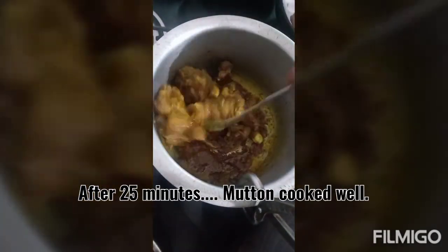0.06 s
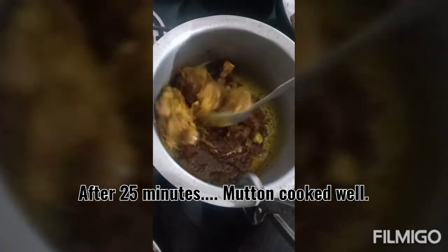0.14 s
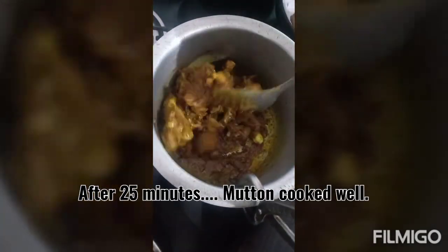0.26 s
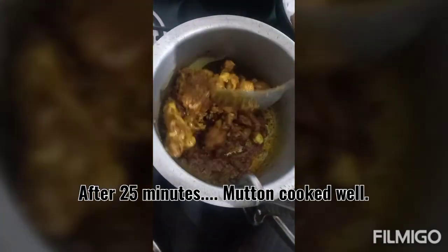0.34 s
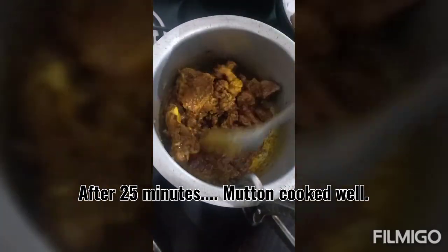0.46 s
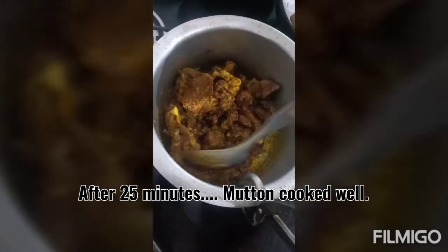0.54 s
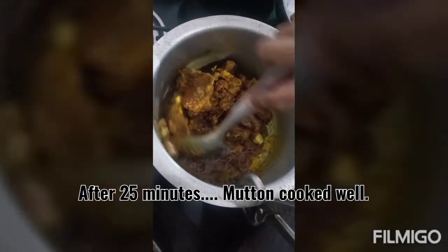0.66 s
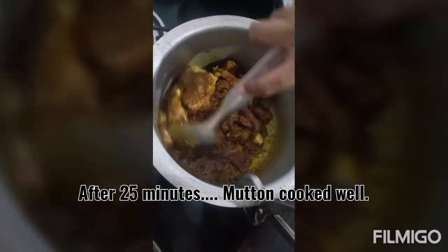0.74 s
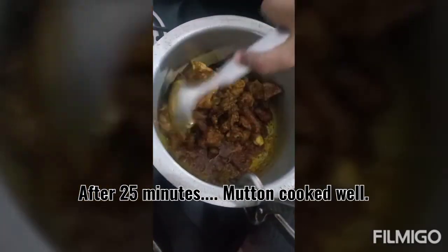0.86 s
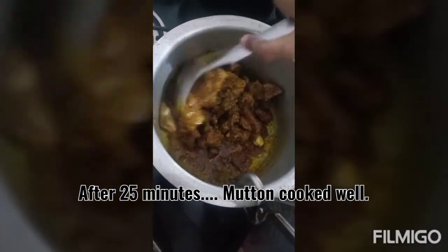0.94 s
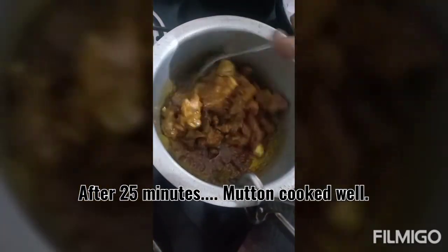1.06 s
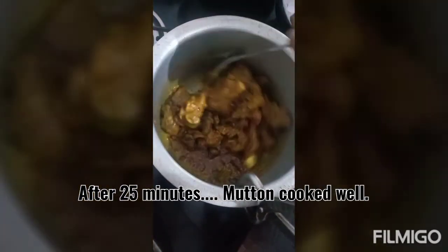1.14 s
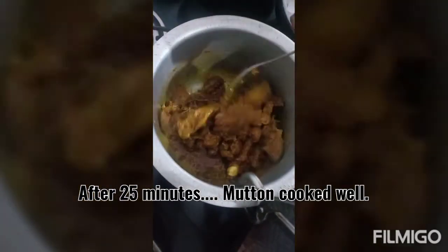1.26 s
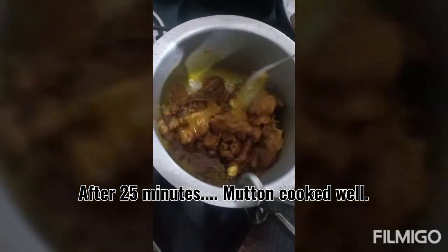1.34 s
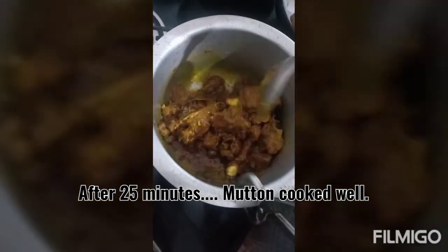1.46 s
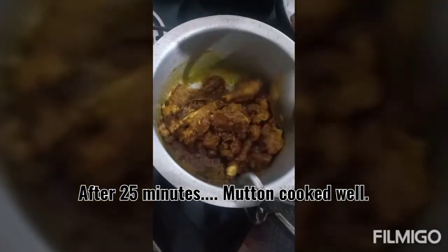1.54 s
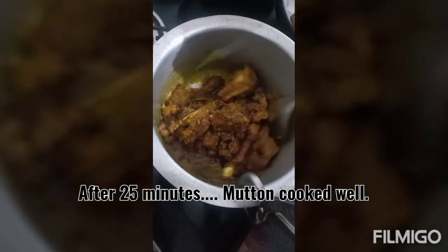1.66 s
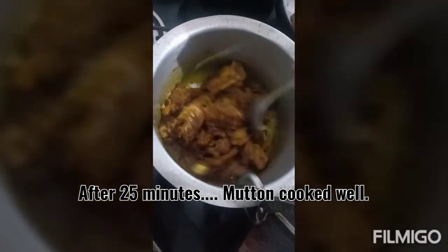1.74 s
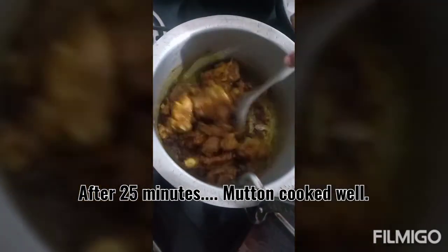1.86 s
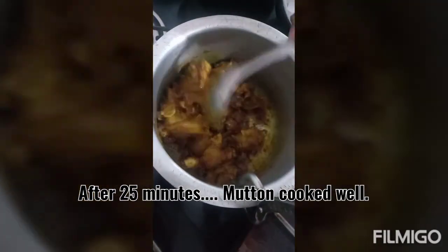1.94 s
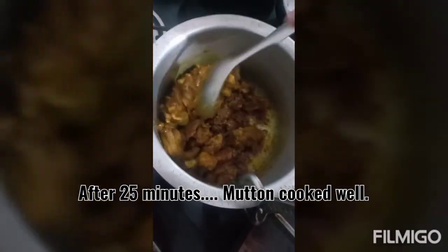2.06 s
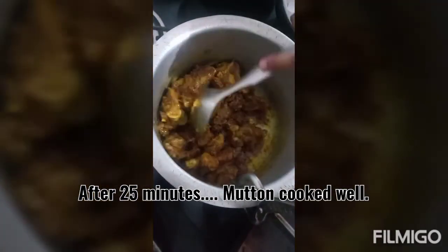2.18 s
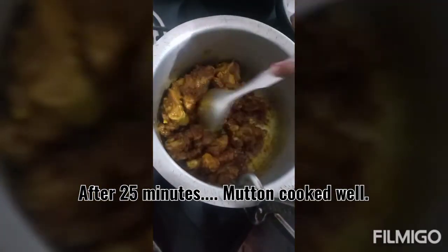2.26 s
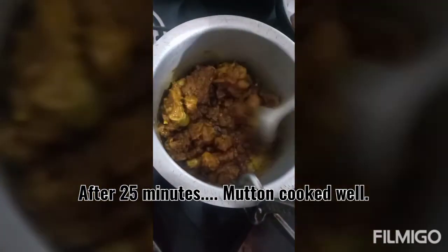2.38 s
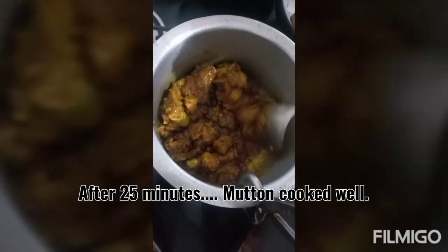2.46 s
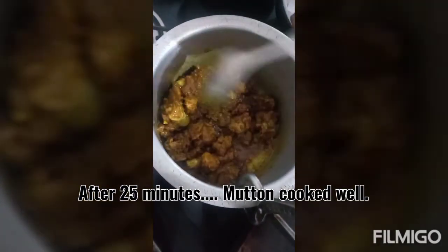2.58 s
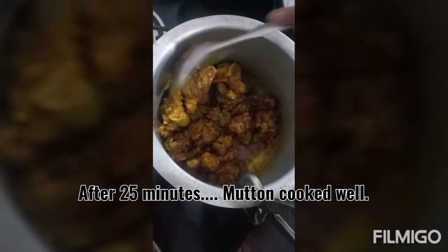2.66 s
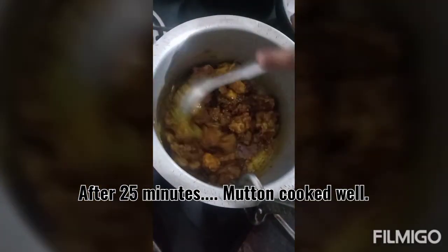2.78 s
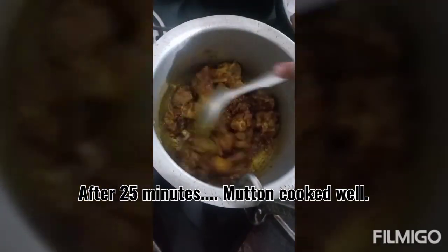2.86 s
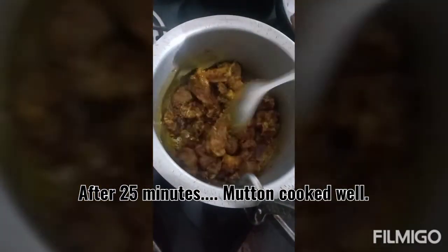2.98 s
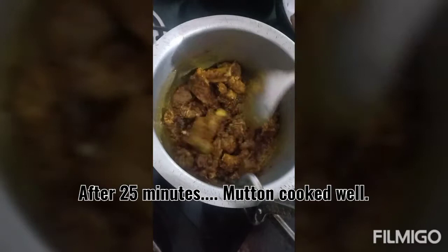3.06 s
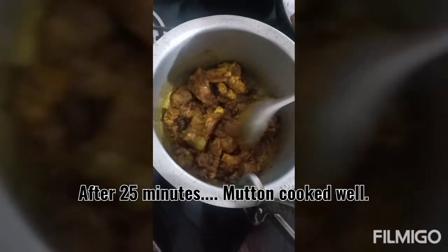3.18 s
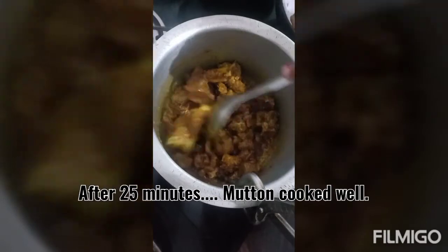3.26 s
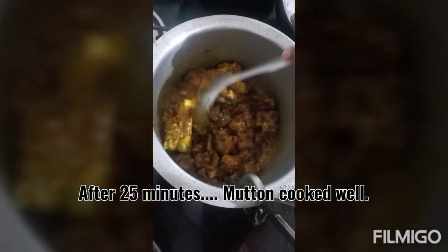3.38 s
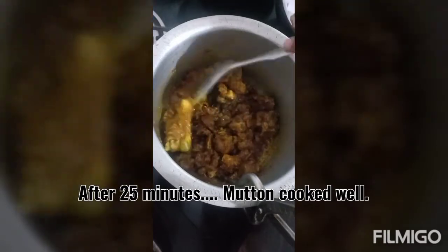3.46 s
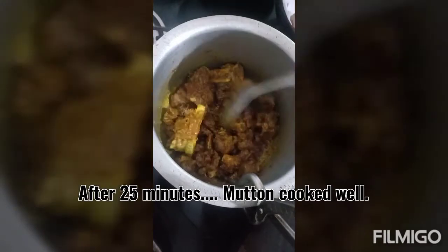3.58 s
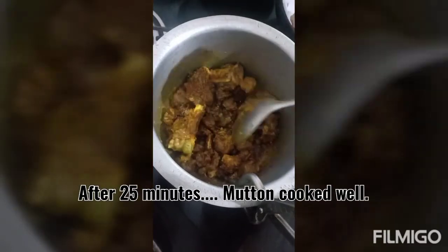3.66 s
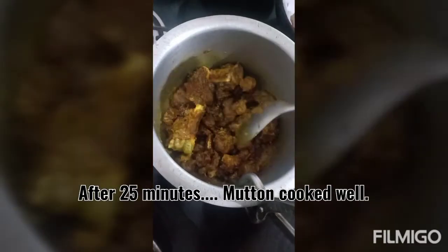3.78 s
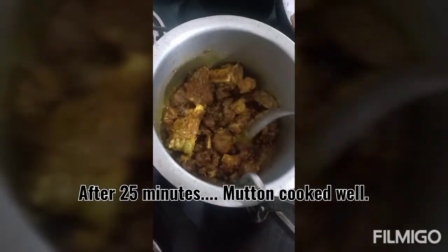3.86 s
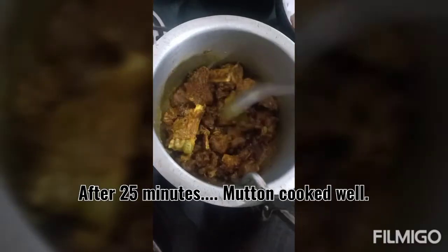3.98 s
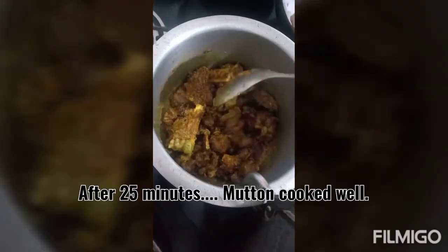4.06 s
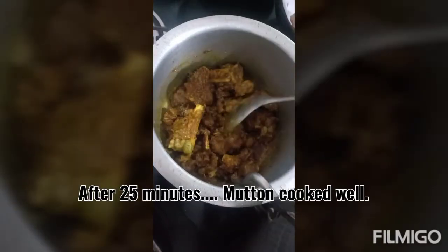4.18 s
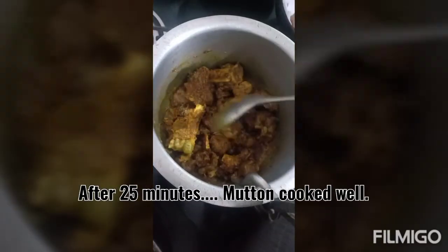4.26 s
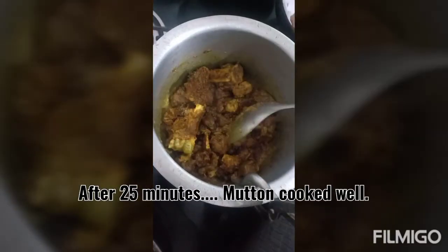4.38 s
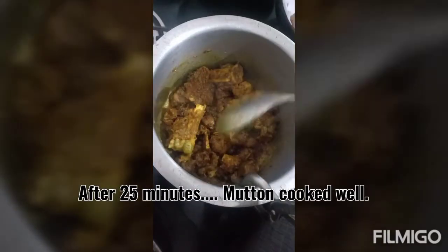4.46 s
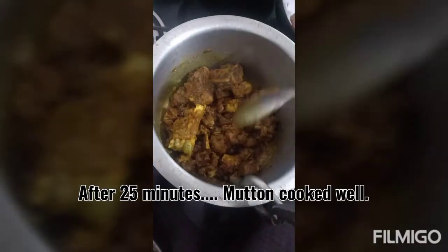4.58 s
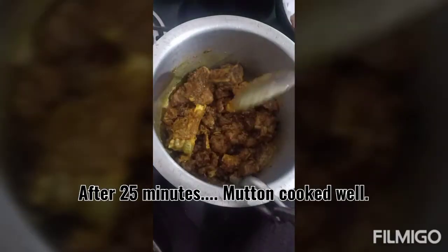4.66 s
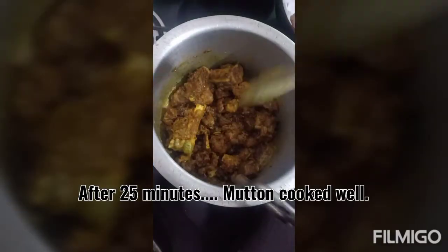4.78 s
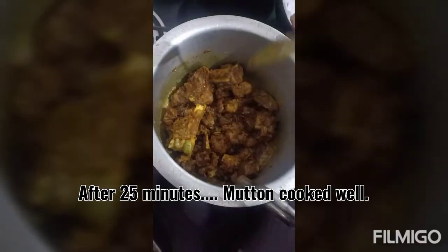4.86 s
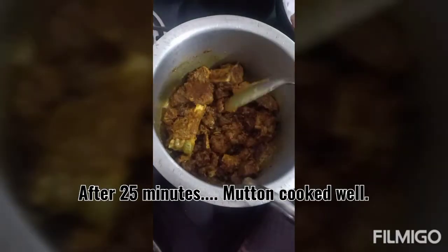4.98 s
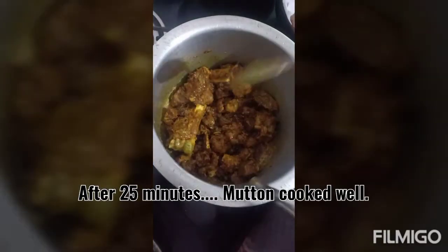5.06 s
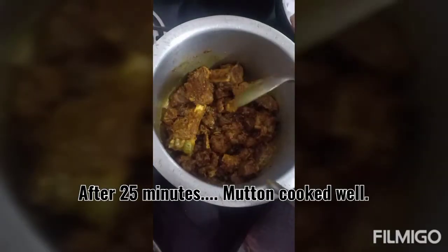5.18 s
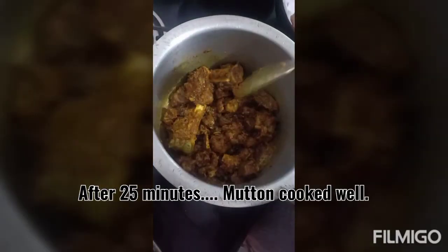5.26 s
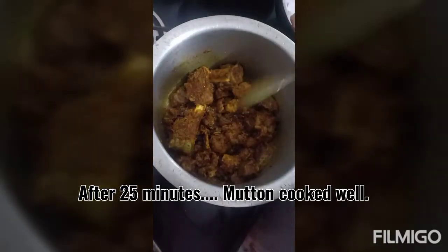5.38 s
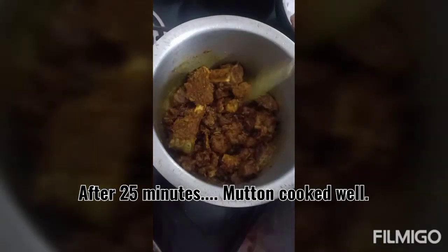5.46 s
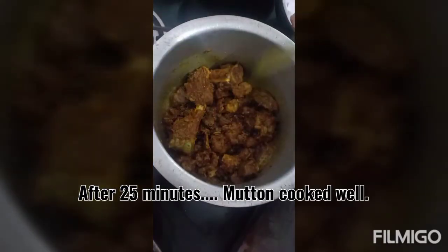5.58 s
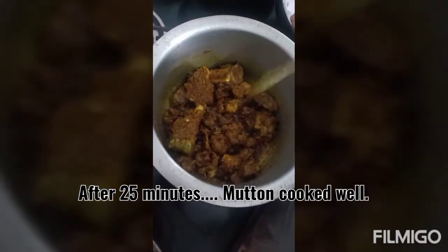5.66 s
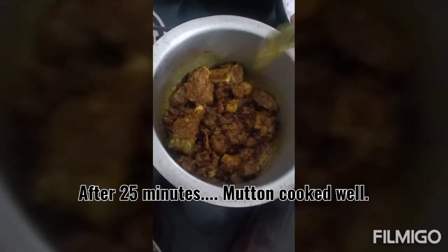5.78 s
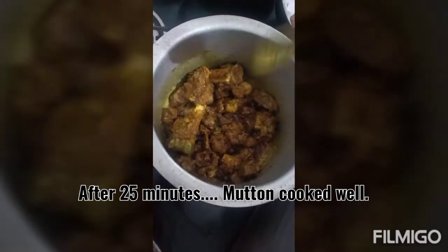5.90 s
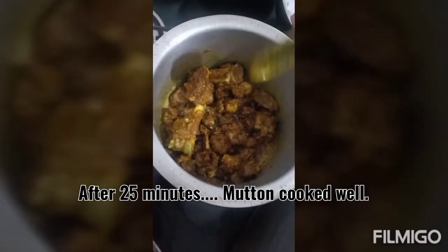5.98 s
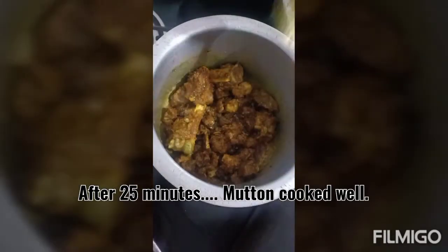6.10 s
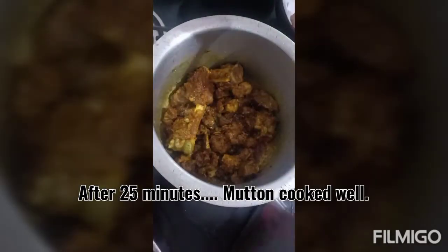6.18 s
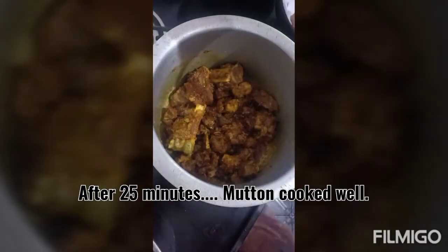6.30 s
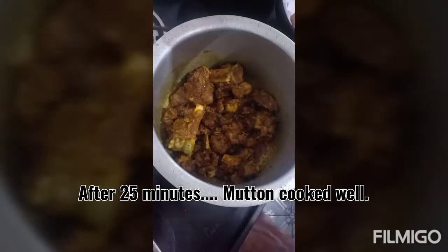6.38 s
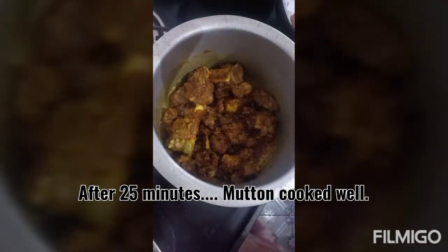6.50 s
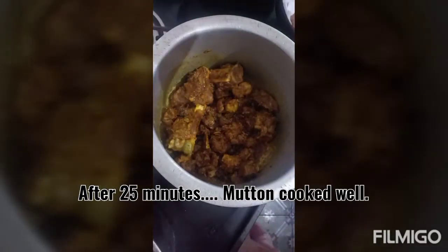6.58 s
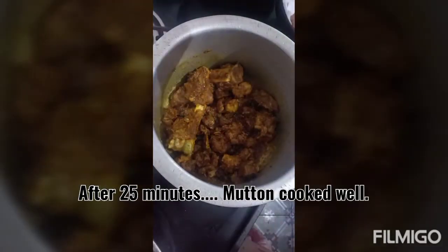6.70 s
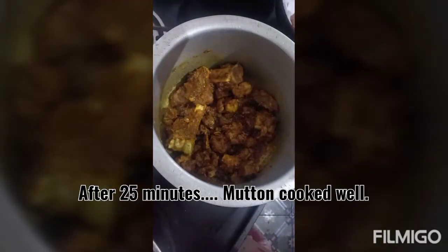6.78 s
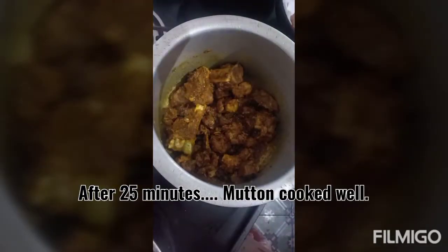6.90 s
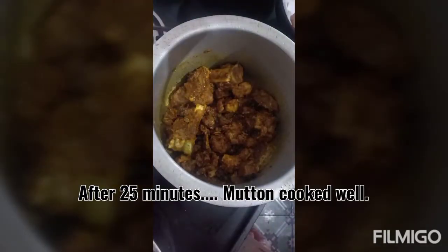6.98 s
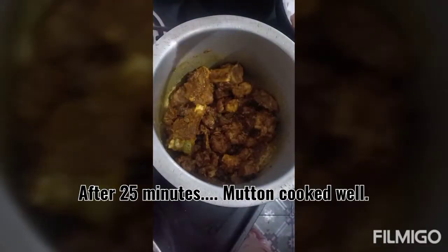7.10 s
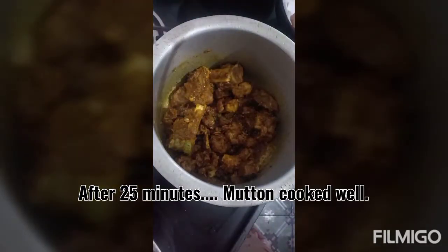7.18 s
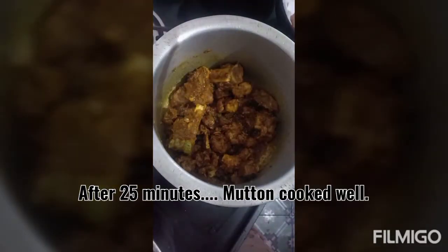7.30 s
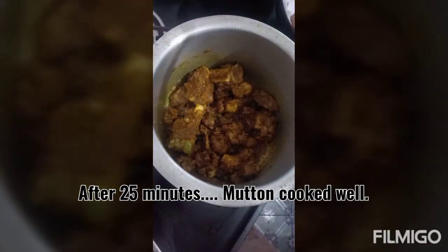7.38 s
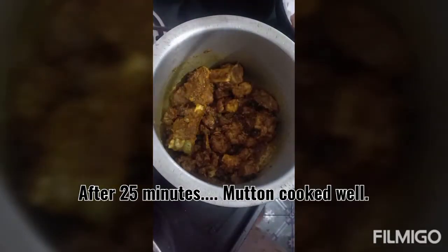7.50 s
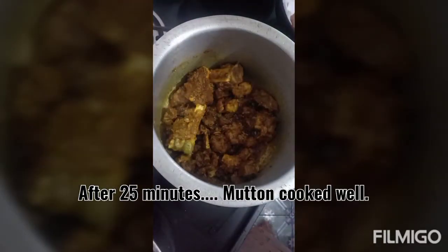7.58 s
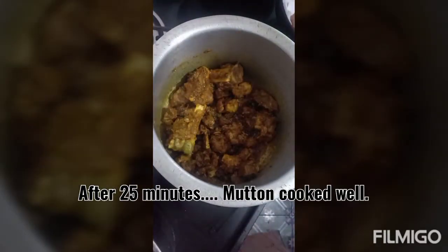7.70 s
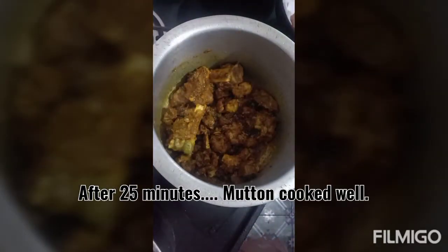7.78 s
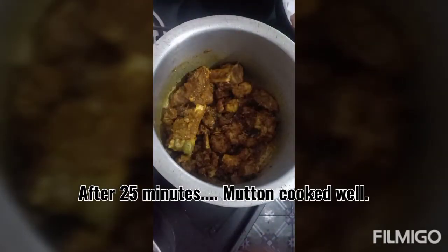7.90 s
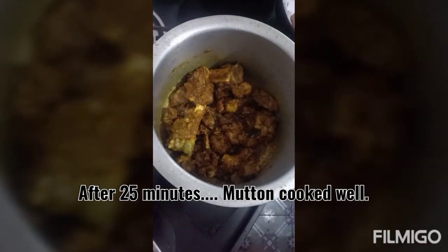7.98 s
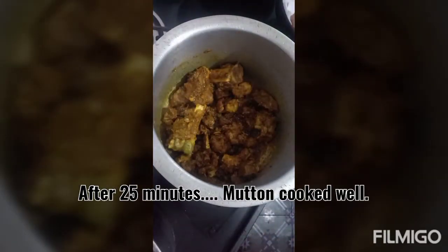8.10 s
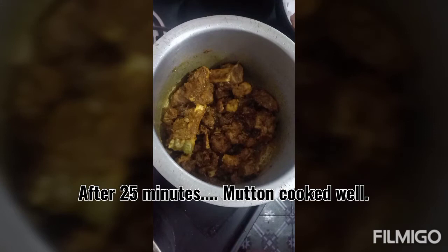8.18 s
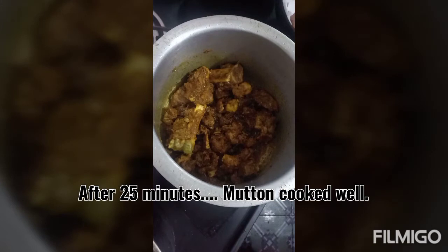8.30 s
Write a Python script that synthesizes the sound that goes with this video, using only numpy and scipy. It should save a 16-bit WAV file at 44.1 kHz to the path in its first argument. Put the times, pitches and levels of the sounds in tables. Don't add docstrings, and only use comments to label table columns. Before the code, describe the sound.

Home kitchen, handheld phone near a metal pot. A ladle rubs and taps through dense stew, with bright rim strikes around one second, two close together, and later three more spaced strikes, the final one hardest. Metallic tones waver and die in short hard-room echo. Afterward only faint hum and hiss remain, broken by dull, boomy knocks farther away on a counter.

```python
import sys
import numpy as np
from scipy import signal
from scipy.fft import rfft, irfft
from scipy.io import wavfile
from scipy.ndimage import uniform_filter1d, minimum_filter1d

SR = 44100
rng = np.random.default_rng(int(sys.argv[2]) if len(sys.argv) > 2 else 0)


def bounce(signal):
    frames = np.transpose(np.atleast_2d(signal))
    limited = np.clip(frames, -1, 1)
    pcm = np.round(limited * 32767).astype(np.int16)
    wavfile.write(sys.argv[1], SR, pcm)


def makeup_ratio(level_db):
    decades = np.asarray(level_db, float) / 20
    return 10 ** decades


N = 368115
LEFT_LAG = 9


def evened(x):
    return x / np.sqrt(np.mean(x ** 2) + 1e-20)


def read(points, hz):
    f, value = np.transpose(points)
    return np.interp(np.log(hz + 1), np.log(f + 1), value)


def add(mix, start_s, sound):
    part = mix[..., max(round(start_s * SR), 0):][..., :sound.shape[-1]]
    part += sound[..., :part.shape[-1]]


def band(x, edges_hz):
    return signal.sosfilt(signal.butter(2, edges_hz, "bandpass", fs=SR, output="sos"), x)


def coloured(x, spectrum):
    gain = makeup_ratio(read(spectrum, np.fft.rfftfreq(len(x), 1 / SR)))
    return irfft(rfft(x) * gain, len(x))


def ringing(modes, damping, scatter_db, twin, size):
    hz, db, t60_s = np.transpose(modes)
    luck = rng.uniform(-1, 1, (len(modes), 6)).T
    fade = np.log(1000) / (damping * np.clip(t60_s, .1, .7))
    twin_hz = hz * (1 + twin * luck[0])
    pole = (2j * np.pi * np.r_[hz, twin_hz] - np.r_[fade, fade])[:, None, None] / SR
    coarse, fine = np.arange(0, size, 100)[:, None], np.arange(100)
    waves = (np.exp(pole * coarse) * np.exp(pole * fine)).reshape(len(pole), -1)
    gain = makeup_ratio(db + scatter_db * luck[1])
    right = np.r_[gain, .5 * gain] * np.exp(2j * np.pi * np.r_[luck[2], luck[3]])
    left = right * np.exp(1j * np.r_[1.2 * luck[4], 3 * luck[5]])
    return (np.array([left, right]) @ waves).imag


# low_hz, high_hz
BANDS = [(1800, 3100), (200, 900), (900, 1800), (3450, 7200), (7200, 16000)]
POLARITY = [1, 1, -1, -1, 1]
TONE_DB = [1.2, 2, -8.5, -4.5, -30]
NOISE_DB = [3, 2, 1, -0.5, 5.5]


def impact(levels_db, ring, colour, crack_db, crack_t60_s, rise_s, belly_share=1, body_db=-99):
    t = np.arange(ring.shape[1]) / SR
    start = np.clip(t / rise_s, 0, 1)
    crack = coloured(rng.standard_normal(len(t)), colour) * makeup_ratio(-60 * t / crack_t60_s) * start
    out = np.zeros((3, len(t)))
    out[2] = makeup_ratio(levels_db[1] - 33.0 - 60 * t / 0.075) * np.sin(2 * np.pi * 70 * t)
    body_fade_db = body_db - 60 * t / 0.027
    for part, edges_hz in enumerate(BANDS):
        db, sign = levels_db[part], POLARITY[part]
        *tone, noise = band(np.vstack([ring * start, crack]), edges_hz)
        clear = makeup_ratio(db + TONE_DB[part]) * (belly_share if part == 1 else 1)
        out[2] += sign * makeup_ratio(db + body_fade_db) * tone[0] / abs(tone[0]).max()
        out[:2] += sign * clear * np.array(tone) / abs(tone[1]).max()
        out[2] += sign * makeup_ratio(db + crack_db + NOISE_DB[part]) * noise / abs(noise).max()
    return out


# start_s, ladle_db, belly_db, rim_db, edge_db
BLOWS = [
    (1.075, -13.5, -17.5, -9, -13.5),
    (1.7651, -12.5, -24, -9.5, -16),
    (3.8378, -22, -20.5, -13, -24.5),
    (4.8632, -23.5, -33, -15.5, -41),
    (5.136, -4.5, -15, -7, -12.5),
]
# pitch_hz, level_db, t60_s
RING_1 = [(635, -18, 0.45), (1513, -20, 0.38), (2261, -8, 0.25), (2428, -11, 0.26), (2498, -23, 0.8),
          (2616, -21, 0.4), (2799, -12, 0.28), (3262, -29, 1.1), (3467, -28, 0.36), (4167, -19, 0.44),
          (4339, -20, 0.49), (4425, -27, 1.9), (4980, 0, 0.069), (5082, -20, 0.48), (5168, -12, 0.25),
          (5480, -23, 0.26), (5642, -21, 0.35), (6304, -28, 0.37), (6778, -18, 0.22), (6826, -24, 0.52),
          (7219, -32, 0.42), (7709, -28, 0.23), (8107, -34, 0.34), (8818, -35, 0.54)]
RING_2 = [(571, -23, 5.0), (624, -17, 5.0), (1475, -15, 0.49), (1906, -24, 5.0), (2153, -7, 0.6),
          (2207, -6, 0.29), (2406, -13, 0.4), (2611, -9, 0.3), (2837, -15, 0.36), (3262, -29, 1.8),
          (4134, -22, 0.82), (4544, -7, 0.31), (4732, -13, 0.4), (4990, -18, 0.76), (5114, -10, 0.38),
          (5292, -22, 0.77), (5658, -22, 0.69), (5970, -22, 0.67), (6137, -24, 1.5), (6713, -23, 0.67),
          (6783, -18, 0.3), (7348, -32, 0.56), (7768, -21, 0.2), (8188, -29, 0.34), (8888, -26, 0.26)]
RING_3 = [(571, -16, 0.62), (1518, -29, 1.4), (1717, -21, 0.4), (2126, -1, 0.38), (2616, -20, 0.64),
          (2966, -19, 0.25), (4091, 0, 0.13), (4398, -26, 0.45), (4689, -15, 0.26), (4764, -20, 0.55),
          (5087, -21, 0.7), (5259, -26, 1.7), (5577, -15, 0.34), (5986, -20, 0.43), (6169, -20, 0.46),
          (6428, -25, 0.39), (6826, -28, 0.36), (7413, -28, 0.32), (7650, -33, 0.25), (8565, -46, .46)]
RING_4 = [(619, -23, 0.12), (1550, -28, 0.5), (2137, 0, 0.1), (2412, -17, 0.15), (2600, -24, 1.7),
          (2961, -26, 0.49), (3871, -30, 0.29), (4721, -26, 0.31), (5582, -31, 0.19), (7784, -40, 0.17)]
RING_5 = [(624, -14, 0.56), (1518, -19, 0.25), (2126, 0, 0.59), (2396, -7, 0.57), (2600, -11, 0.56),
          (3618, -27, 0.72), (4161, -14, 0.9), (4544, -8, 0.59), (5076, -10, 0.66), (5577, -8, 0.44),
          (5959, -15, 0.7), (6374, -28, 0.99), (6799, -21, 0.54), (7321, -26, 0.46), (8204, -31, 0.54),
          (8705, -23, 0.24), (9862, -36, 0.68), (10170, -14, 0.13), (10570, -19, 0.16), (11590, -29, 0.46)]
CONTACT_DB = [-2.5, -1, -0.5, -8, -2.5]
BELLY_RING = [0.75, 0.92, 0.27, .3, 0.16]
BLOW_WALL_DB = [-4.5, 10.5, 0, 10, -47.5]
BODY_DB = [-14, 4, 0.5, 4, 5.5]
# pitch_hz, density_db
CRACK = [(88, -79), (150, -38), (323, -11.5), (386, -45), (442, -12.5), (618, -10.5), (1330, -16),
         (1750, -15.5), (2180, -9), (2750, -15), (3300, -22.5), (3900, -18), (5170, -11), (8130, -28.5),
         (10500, -31.5), (13600, -24.5), (15300, -29), (16500, -106)]


def blows():
    out = np.zeros((3, N))
    rings = [RING_1, RING_2, RING_3, RING_4, RING_5]
    settings = zip(BLOWS, rings, CONTACT_DB, BELLY_RING, BLOW_WALL_DB, BODY_DB)
    for (start_s, ladle, belly, rim, edge), modes, contact_db, share, wall_db, body_db in settings:
        ring = ringing(modes, .9, 0, .003, size=26000)
        levels_db = [ladle, belly, belly + wall_db, rim, edge]
        hit = impact(levels_db, ring, CRACK, contact_db, 0.044, 0.0031, share, body_db)
        add(out, start_s - .001, makeup_ratio(-0.5) * hit)
    return out


# start_s, pitch_hz,
# level_db, t60_s
BLOOMS = [(1.15, 654, -53, 0.31), (1.805, 612, -26.5, 0.53), (1.86, 2611, -36.5, 0.58),
          (3.858, 2127, -47, 0.57), (4.866, 1520, -43.5, 0.84), (5.19, 1516, -46, .25),
          (5.26, 4540, -37.5, 0.1), (6.696, 261, -41.5, 0.42), (4.872, 2120, -32.5, .8)]


def blooms():
    out = np.zeros((3, N))
    for start_s, hz, db, t60_s in BLOOMS:
        ring = ringing([(hz, db, t60_s)], 1, 0, .006, size=20000)
        t = np.arange(ring.shape[1]) / SR
        rough = evened(band(rng.standard_normal(len(t)), (hz * 1.0, hz * 1.01)))
        rough = rough * makeup_ratio(db + 0.5 - 60 * t / 0.29)
        add(out, start_s, np.vstack([ring, rough]) * np.clip(t / 0.0084, 0, 1))
    return out


# start_s, pitch_hz, beat_hz, t60_s
BEATS = [(.5, 1502, 12, .6), (.53, 622, 17, .5), (1.1, 666, 9, .35), (1.15, 627, 5, .5),
         (1.762, 2150, 25, .1), (1.763, 2420, 30, .08), (1.8, 569, 6, .35), (1.81, 624, 7, .4),
         (2.945, 2500, 90, .02), (3.838, 568, 8, .3), (3.848, 2138, 21.5, .7), (3.856, 2145, 25, .12),
         (4.868, 2131, 17, .22), (4.897, 5140, 25, .12), (5.134, 2396, 20, .12), (5.17, 571, 5, .4),
         (5.187, 1516, 9.5, .5), (5.258, 2125, 12, .25), (5.265, 2602, 15, .3), (5.372, 2396, 10, .4),
         (7.565, 720, 70, .03)]
BEATS_DB = [-40.5, -33.5, -23, -27.5, -12.5, -2.5, -25, -29, -29, -24, -21.5, -12, -24.5, -36, -20, -27,
            -18, -21, -21.5, -31.5, -30]


def beats():
    out = np.zeros(N)
    for (start_s, hz, beat_hz, t60_s), db in zip(BEATS, BEATS_DB):
        t = np.arange(0, t60_s, 1 / SR)
        throb = np.sin(np.pi * beat_hz * t)
        add(out, start_s, makeup_ratio(db - 60 * t / t60_s) * throb * np.sin(2 * np.pi * hz * t))
    return out * makeup_ratio([[-3.0], [1.5]])


# pitch_hz, level_db, t60_s
POT = [(570, -8, .4), (625, 0, .5), (700, -12, .3), (1220, -6, .15), (1513, -8, .4), (2126, -3, .35),
       (2220, -6, .3), (2396, -5, .3), (2600, -8, .3), (2800, -9, .25), (4160, -12, .25), (4544, -9, .25),
       (5090, -8, .25), (5577, -11, .2), (5980, -13, .2), (6800, -18, .2), (8600, -22, .15),
       (13300, -20, .1)]
# start_s, ladle_db, belly_db, wall_db, rim_db
CLINKS = [
    (0.0014, -45, -37.5, -32.5, -45),
    (0.4065, -43, -53.5, -29.5, -34),
    (0.4804, -49, -42.5, -38, -59),
    (2.4944, -71, -48, -50, -43.5),
    (2.9744, -47, -47, -68, -43.5),
    (3.0554, -65, -61, -71, -43.5),
]
# start_s, ladle_db, belly_db, rim_db
TICKS = [(0.1744, -35.5, -36.5, -53), (0.5993, -44, -54, -37), (2.2902, -37, -55, -57),
         (2.4484, -40, -44, -38), (2.5395, -48, -48.5, -39.5), (2.6294, -51, -73, -42.5),
         (3.9849, -54, -49, -37), (4.2862, -33, -46.5, -34.5), (4.9703, -43.5, -36.5, -35),
         (5.261, -31, -43, -19.5)]
# start_s, ladle_db, belly_db, rim_db
GRAZES = [
    (1.0391, -43, -54, -42),
    (1.704, -36, -50, -42.5),
    (1.7369, -45, -40.5, -54),
    (3.821, -38.5, -44.5, -46),
]


def clinks():
    out = np.zeros((3, N))
    for start_s, *levels_db in CLINKS:
        ring = ringing(POT, 0.38, 7.1, 0.027, size=9000)
        levels_db = levels_db + [levels_db[-1] - 7]
        add(out, start_s - .001, makeup_ratio(6.0) * impact(levels_db, ring, CRACK, 0.99, 0.0094, 0.00021))
    for start_s, ladle, belly, rim in list(TICKS) + list(GRAZES):
        thud = ringing(POT, .07, 5.0, .06, size=3000)
        levels_db = [ladle, belly, (ladle + belly) / 2 - 0.5, rim, rim - 10.5]
        add(out, start_s - .001, makeup_ratio(4.0) * impact(levels_db, thud, CRACK, 1.4, 0.026, 0.00008))
    return out


# time_s, level_db
STIRRING = [(0.0, -51.5), (0.7, -63), (1.6, -59), (2.3, -53), (2.75, -59.5), (3.2, -55.5), (3.7, -55),
            (4.45, -60), (4.9, -65), (5.3, -68)]
# firmest_s, length_s, ladle_db, belly_db
RUBS = [(0.043, 0.19, -42.5, -37), (0.204, 0.11, -44, -63), (0.833, 0.67, -43, -56),
        (2.305, 0.17, -63, -46.5), (2.505, 0.044, -42, -64), (2.961, 0.23, -43.5, -48),
        (3.652, 0.027, -35, -72), (4.303, 0.047, -43, -41.5), (4.627, 0.57, -46, -55.5),
        (6.935, 0.14, -54, -76)]


def scraping():
    slip_rate_hz = 3000
    slips = rng.standard_normal(N) * makeup_ratio(2.8 * np.minimum(rng.exponential(1, N), 5))
    slips = slips * (rng.random(N) < slip_rate_hz / SR)
    pot = signal.oaconvolve(slips, ringing(POT, .2, 1, .03, size=6000)[0])[:N]
    rub = evened(pot) + 1.6 * evened(coloured(slips, CRACK))
    parts = [sign * evened(band(rub, edges_hz)) for sign, edges_hz in zip(POLARITY, BANDS)]
    t = np.arange(0, N, 64) / SR
    stir = makeup_ratio(np.interp(t, *np.transpose(STIRRING)))
    ladle, belly = stir ** 2, (makeup_ratio(-4.5) * stir) ** 2
    for firmest_s, length_s, ladle_db, belly_db in RUBS:
        away = np.maximum((t - firmest_s) / length_s, (firmest_s - t) / (0.5 * length_s))
        press = makeup_ratio(-38 * away) * np.clip(4 * (1.2 - away), 0, 1)
        ladle = ladle + (makeup_ratio(ladle_db) * press) ** 2
        belly = belly + (makeup_ratio(belly_db) * press) ** 2
    wall = np.sqrt(ladle * belly) * makeup_ratio(-11.0)
    rim = stir ** 2 + makeup_ratio(2 * -5) * (ladle - stir ** 2)
    levels = np.sqrt([ladle, belly, wall, rim, rim * makeup_ratio(-54)])
    at = np.arange(N) / SR
    return makeup_ratio(-1.5) * sum(np.interp(at, t, level) * part for level, part in zip(levels, parts))


# start_s, pitch_hz, level_db, t60_s
TAPS = [(.318, 563, -44, 0.041), (.406, 1145, -16, 0.016), (.406, 632, -24, 0.094), (.407, 1516, -33, 0.19),
        (.481, 655, -29, 0.064), (.481, 1140, -44, 0.016), (.6, 5250, -46, 0.011), (.79, 2070, -31, 0.025),
        (1.037, 2730, -20.5, 0.02), (1.044, 2730, -45, 0.018), (1.075, 3780, -17.5, 0.061),
        (1.715, 670, -37.5, 0.063), (1.716, 2230, -31, 0.05), (1.74, 1300, -27, 0.019),
        (1.766, 2220, -8, 0.034), (1.767, 2350, -38, 0.044), (1.804, 2110, -8, .04),
        (1.81, 468.7, -29.5, 0.21), (1.822, 657, -18.5, 0.067), (1.84, 572, -23.5, 0.13),
        (2.29, 555, -39.5, 0.054), (2.41, 1270, -37, 0.035), (2.449, 636, -24.5, 0.034),
        (2.458, 2480, -24, 0.019), (2.494, 1134, -27.5, 0.026), (2.68, 2820, -30.5, 0.013),
        (2.864, 580, -47.5, 0.069), (2.917, 2020, -36.5, 0.033), (2.954, 544, -35, 0.064),
        (2.972, 573, -30.5, 0.041), (2.995, 574, -36, 0.1), (3.054, 620, -39, 0.045),
        (3.326, 664, -44, 0.068), (3.648, 2720, -35, 0.019), (3.838, 775, -14, 0.031),
        (3.839, 4100, -50, 0.028), (3.839, 5160, -13.5, 0.027), (3.84, 2690, -15.5, 0.04),
        (5.137, 2216, -12.5, 0.25), (5.215, 606, -31, 0.092), (5.258, 5090, -18, 0.08),
        (5.258, 2320, -25, 0.05), (.466, 1480, -30, 0.05), (5.138, 208, -24, 0.027),
        (3.839, 550, -22.5, 0.052), (1.74, 3120, -35, 0.018), (.408, 2280, -30, 0.028)]
# start_s, pitch_hz, level_db, t60_s
BOUNCES = [(1.766, 2150, -14, .02), (3.6, 3700, -41, .012), (3.839, 480, -21, .03), (3.86, 2148, -43, .3),
           (4.315, 5300, -36, .015), (4.864, 7800, -40, .0093), (5.259, 13000, -24, .004),
           (5.259, 8400, -27, .005), (5.259, 13500, -29, .004)]
# start_s, pitch_hz, level_db, t60_s
FAR_TAPS = [(6.126, 13600, -29, 0.013), (6.126, 11250, -38.5, 0.016), (6.126, 15800, -48, .012),
            (6.127, 4470, -34.5, 0.023), (6.695, 2250, -37, .03), (7.157, 824, -44, 0.049),
            (7.18, 930, -44, 0.038), (7.275, 2330, -35.5, .03), (7.327, 5500, -33, .014),
            (7.328, 2600, -25, 0.017), (7.327, 11000, -30.5, 0.0067), (7.327, 2010, -21, 0.015),
            (7.328, 2380, -31, 0.015), (7.328, 13300, -28.5, .006), (7.328, 1160, -19.5, 0.014),
            (7.568, 760, -31, .02)]
# start_s, pitch_hz, level_db, t60_s
BOOMS = [(1.078, 109, -62, .5), (5.138, 45, -42, .12), (5.15, 110.4, -39.5, 1), (5.25, 60.3, -50, .12),
         (6.7, 113, -47, 0.69), (7.33, 110, -42.5, 0.8), (7.33, 40, -50, .15)]


def taps(table):
    out = np.zeros(N)
    for start_s, hz, db, t60_s in table:
        t = np.arange(0, abs(t60_s), 1 / SR)
        rise = np.clip(t * hz, 0, 1)
        add(out, start_s, makeup_ratio(db - 60 * t / abs(t60_s)) * rise * np.sin(2 * np.pi * hz * t))
    return out


# start_s, middle_db, low_db, high_db, top_db
KNOCKS = [
    (6.125, -52.5, -60, -40, -42.5),
    (6.694, -37, -41, -34.5, -43),
    (6.766, -39.5, -45, -47, -50.5),
    (7.1567, -42, -45, -42.5, -44),
    (7.3275, -28.5, -26, -53, -25),
    (7.5705, -65, -44.5, -46, -72),
]
# pitch_hz, density_db
FAR = [(71, -50), (120, -4.5), (163, -28), (257, -12), (487, -11.5), (706, -3), (1090, -20), (2530, -2.5),
       (4600, -12), (5650, -7), (6530, -19), (8710, -23.5), (9660, -38.5), (13200, -18.5), (16500, -79)]


def knocks():
    out = np.zeros((3, N))
    for start_s, middle, low, high, top in KNOCKS:
        ring = ringing(POT, .12, 6.0, .08, size=9000)
        levels_db = [middle, low, low + 3, high, top]
        add(out, start_s - .001, makeup_ratio(-4.0) * impact(levels_db, ring, FAR, 6.0, 0.053, 0.00024))
    return out


# pitch_hz, density_db
AIR = [(20, -21), (45, -43), (102, -5), (179, -9), (265, -6), (634, -7.5), (1500, -12), (2400, -10),
       (5070, -13), (7200, -21.5), (9800, -28.5), (13500, -24), (15000, -29), (16500, -60.5)]
# pitch_hz, correlation
SAME = [(60, -0.074), (180, 1), (550, 0.51), (1650, -0.13), (4970, -0.06), (15000, 0.096)]
# pitch_hz, width_hz, level_db
HUM = [
    (93.3, 12.5, -63.5),
    (115.3, 8.9, -61.5),
    (150, 7.3, -71),
]
# time_s, level_db
DRONE = [(0.0, -55), (0.3, -57.5), (1.41, -57.5), (1.95, -59), (2.23, -58), (2.74, -57.5), (4.13, -57.5),
         (4.44, -59.5), (5.25, -59.5), (5.55, -60.5), (6.27, -63.5), (6.97, -60), (8.34, -60)]


def air():
    frames, hz = N // 256 + 5, np.fft.rfftfreq(1024, 1 / SR)
    a, b, c, d, patches = rng.standard_normal((frames, 513, 5)).T
    patches = evened(uniform_filter1d(uniform_filter1d(patches, 12, 0), 14, 1))
    same, left = np.clip(read(SAME, hz), -1, 1)[:, None], a + 1j * b
    z = np.array([left, same * left + np.sqrt(1 - same ** 2) * (c + 1j * d)])
    z *= makeup_ratio(read(AIR, hz)[:, None] + 2.75 * patches)
    hiss = makeup_ratio(-50) * evened(signal.istft(z, nperseg=1024, noverlap=768)[1][:, :N])
    hum, t = np.zeros(N), np.arange(N) / SR
    for f, width_hz, db in HUM:
        r = np.exp(-np.pi * width_hz * 60 / SR)
        drift = rng.standard_normal(N // 60 + 2) + 1j * rng.standard_normal(N // 60 + 2)
        slow = signal.lfilter([1], [1, -2 * r, r * r], drift)
        slow = np.interp(t, np.arange(len(slow)) * 60 / SR, slow)
        hum += makeup_ratio(db) * evened((slow * np.exp(2j * np.pi * f * t)).real)
    swell_db = np.interp(t, *np.transpose(DRONE))
    swell_db = swell_db - swell_db.mean()
    return (hiss * makeup_ratio(1.23 * swell_db) + hum * makeup_ratio(swell_db)) * makeup_ratio([[-1.5], [1.5]])


# pitch_hz, t60_s
KITCHEN = [(200, 0.79), (700, 0.7), (2200, 0.65), (5000, 0.56), (9000, 0.46), (14000, 0.34)]


def kitchen(x, start):
    echoes, slots = np.zeros((2, 32000)), np.arange(start, 31980, 20)
    at = slots + rng.integers(0, 20, (2, len(slots)))
    np.put_along_axis(echoes, at, rng.choice([-1., 1.], at.shape), 1)
    hz, t, z = signal.stft(echoes, SR, nperseg=256)
    fade = makeup_ratio(-60 * t / read(KITCHEN, hz)[:, None])
    tail = signal.istft(z * fade, SR, nperseg=256)[1]
    return signal.fftconvolve(x[None], tail / np.linalg.norm(tail[0]), axes=1)[:, :N]


def heard(ring, contact, left_db, right_db, wet_db, ring_wet_db):
    direct = (ring + [np.roll(contact, LEFT_LAG), contact]) * makeup_ratio([[left_db], [right_db]])
    return direct + makeup_ratio(wet_db) * kitchen(contact + makeup_ratio(ring_wet_db) * ring[1], start=250)


def limited(x):
    power_db = 10 * np.log10(signal.lfilter([.012], [1, .012 - 1], (x ** 2).mean(0)) + 1e-12)
    fall_db = np.arange(N) * 300. / SR
    over_db = np.maximum(np.maximum.accumulate(power_db + fall_db) - fall_db + 16.0, 0)
    late_db = signal.lfilter([.004], [1, .004 - 1], over_db)
    return np.clip(x / makeup_ratio(.8 * late_db), -.84, .84)


# pitch_hz, rise_db
THRIFT = [(6300, -45), (7000, -14), (7700, 4), (9800, 6.5), (12800, 3.5), (13050, -6.5), (13900, -3),
          (14200, 3), (15500, 14), (16500, 41.5)]
# start_s, end_s, low_hz, high_hz
STARVED = [
    (5.15, 5.24, 3120, 3470),
    (6.175, 6.245, 300, 2000),
    (7.355, 7.43, 6200, 6800),
    (3.836, 4.1, 12500, 16500),
]


def thinned(x):
    hz, t, z = signal.stft(x, SR, nperseg=512, noverlap=384)
    bins, frames = 8, 8
    near = uniform_filter1d((abs(z) ** 2).mean(0), bins, 0)
    power_db = 10 * np.log10(uniform_filter1d(near, frames, 1) + 1e-16)
    row, col = np.arange(len(hz)) // bins, np.arange(len(t)) // frames
    block_db = power_db[bins // 2::bins, frames // 2::frames]
    block_db = block_db[np.minimum(row, row[-1] - 1)][:, np.minimum(col, col[-1] - 1)]
    usual_db = np.percentile(block_db, 20, axis=1)[:, None]
    luck = rng.standard_normal(len(t))[col]
    spare_db = 3.0 * luck + 7 * (luck > .9) - 1
    spare_db = spare_db + 1.2 * rng.standard_normal(z.shape[1:])[row][:, col]
    loud_db = 10 * np.log10(near.mean(0) + 1e-16)
    middle_db = np.median(loud_db)
    spare_db = spare_db - 0.16 * np.maximum(loud_db - middle_db, 0)
    spare_db = spare_db + 0.58 * np.minimum(uniform_filter1d(loud_db, size=150) - middle_db, 0)
    kept = np.clip((block_db - usual_db - read(THRIFT, hz)[:, None] + spare_db) / 2, 0, 1)
    near_db = 10 * np.log10(uniform_filter1d(near, 3 * bins, 0) + 1e-16)
    ahead_db = -minimum_filter1d(-near_db, size=7, origin=-3, axis=1)
    kept *= np.clip((near_db - ahead_db + 36) / 5, .03, 1)
    stripes = rng.random(z.shape[1:])[np.arange(len(hz)) // 3][:, col // 3] < .3
    loudness = np.clip((uniform_filter1d(loud_db, 9) - middle_db - 8) / 4, 0, 1)
    kept *= 1 - stripes * (hz > 7400)[:, None] * loudness
    for start_s, end_s, low_hz, high_hz in STARVED:
        kept[np.ix_((hz > low_hz) & (hz < high_hz), (t > start_s) & (t < end_s))] *= .08
    return signal.istft(z * kept, SR, nperseg=512, noverlap=384)[1][:, :N]


def scene():
    hard, light, far = blows() + blooms(), clinks(), knocks()
    near = taps(TAPS)
    close = np.array([np.roll(near, LEFT_LAG), near]) * makeup_ratio([[-4.0], [0.5]])
    light_contact = light[2] + scraping() + makeup_ratio(-4) * near
    mix = heard(hard[:2], hard[2] + taps(BOUNCES), -6.0, 1.9, 2.37, -14.0)
    mix = mix + heard(light[:2], light_contact, -7.5, 2.65, -1.14, 0.0)
    mix = mix + heard(far[:2], far[2] + taps(FAR_TAPS), -2.0, 0.93, 3.7, -26.5)
    return mix + close + beats() + air() + taps(BOOMS) * makeup_ratio([[-2.5], [1.5]])


def low_pass(x):
    return signal.sosfilt(signal.butter(12, 16790, fs=SR, output="sos"), x)


def record(dry):
    mix = thinned(limited(dry))
    return low_pass(mix)


dry = scene()
out = record(dry)
bounce(out)
```